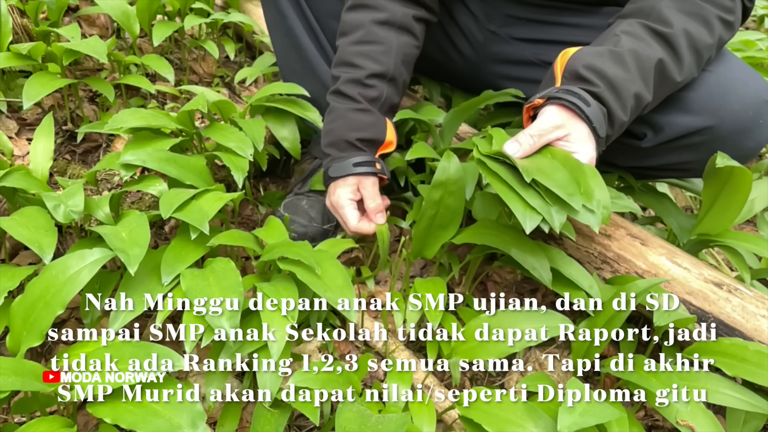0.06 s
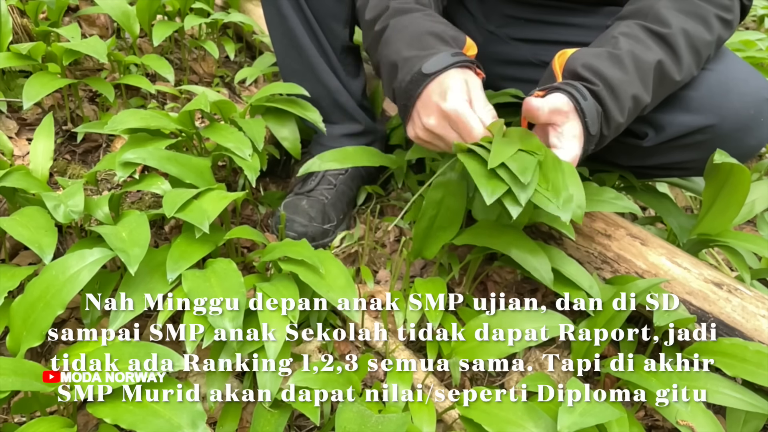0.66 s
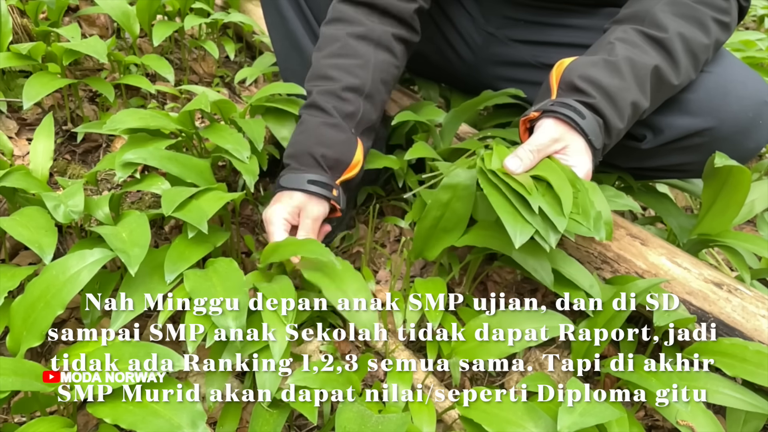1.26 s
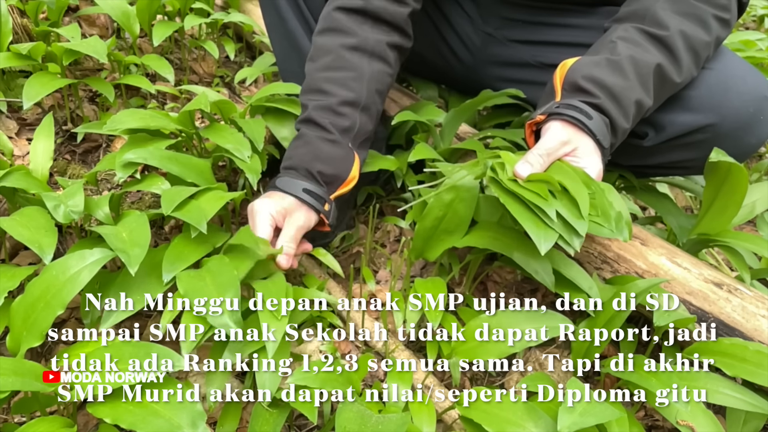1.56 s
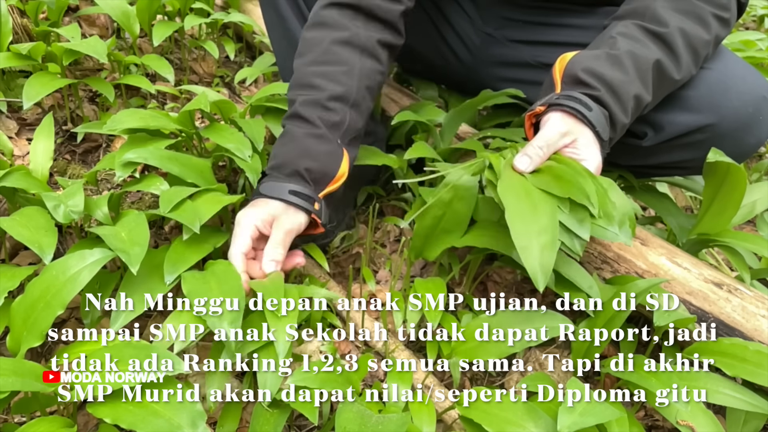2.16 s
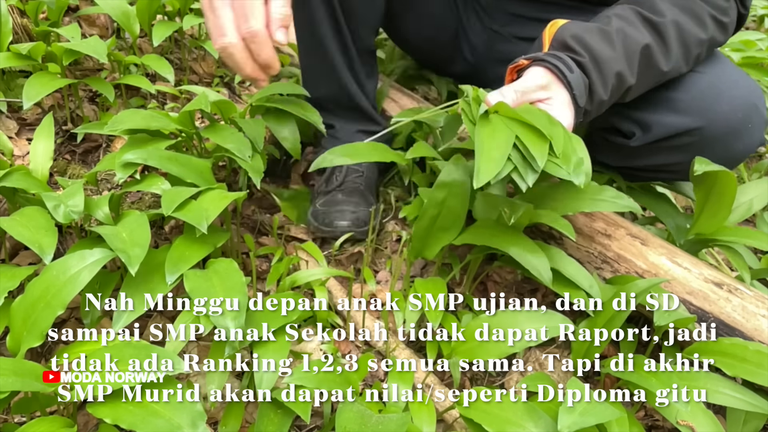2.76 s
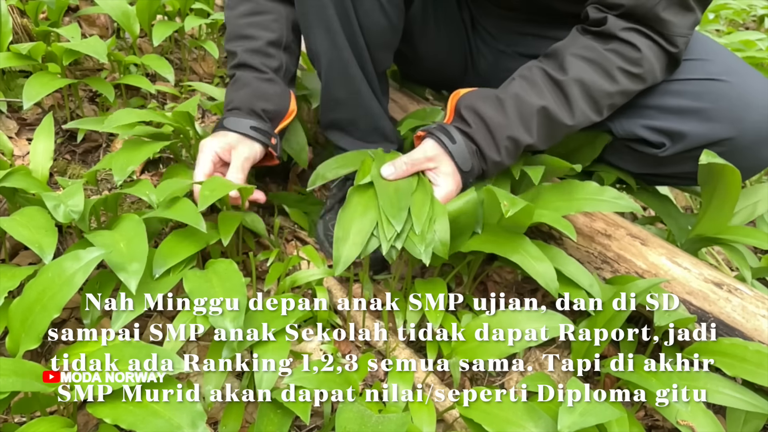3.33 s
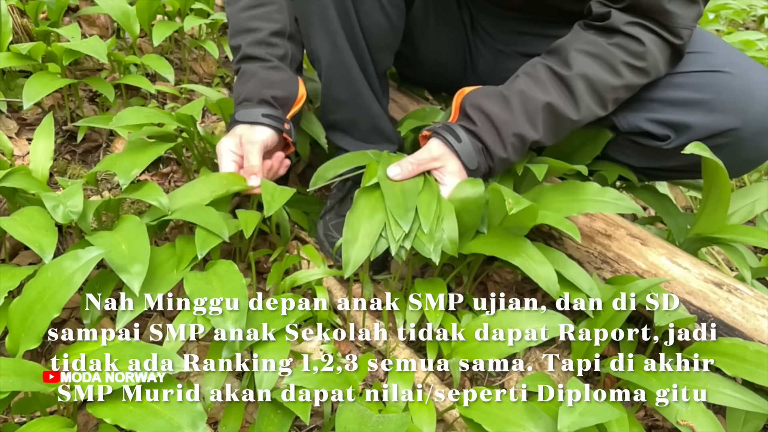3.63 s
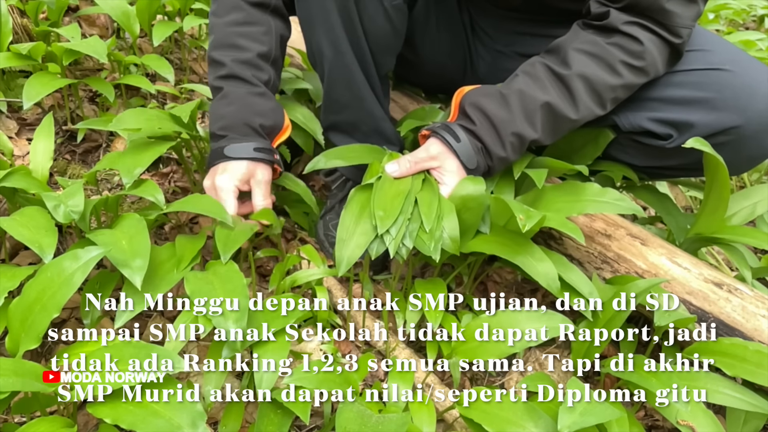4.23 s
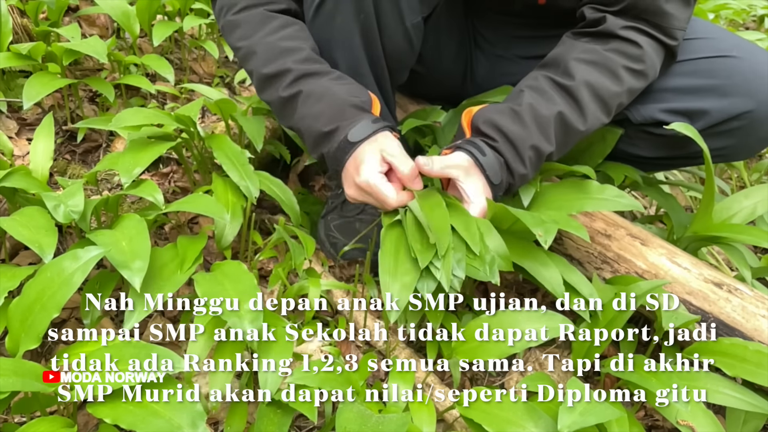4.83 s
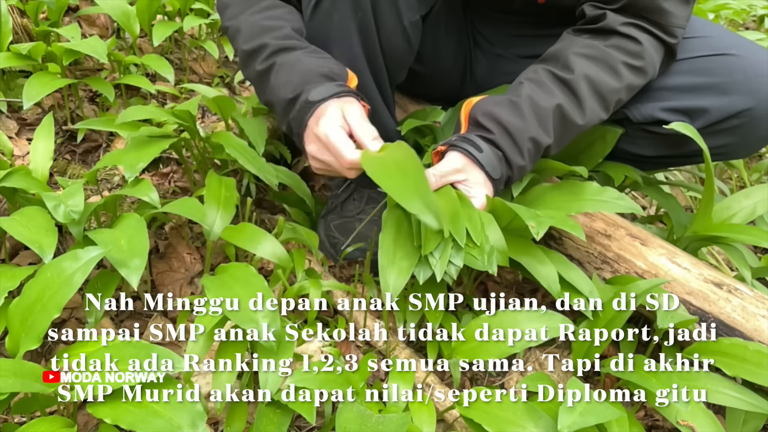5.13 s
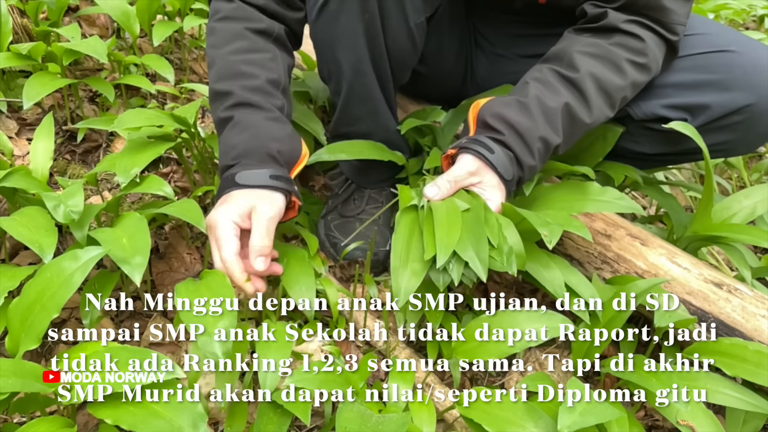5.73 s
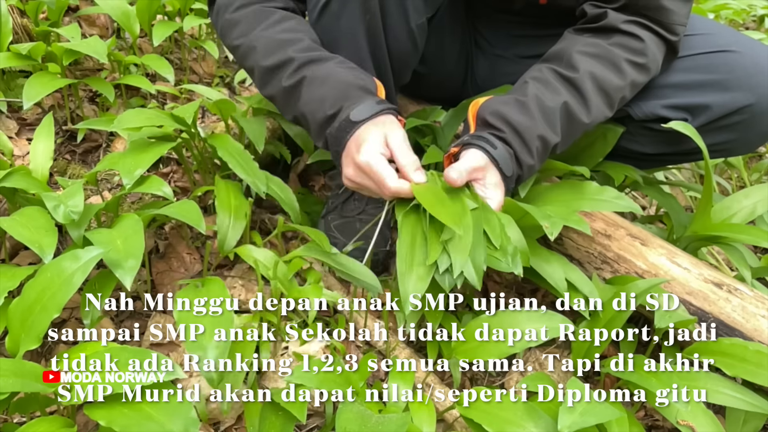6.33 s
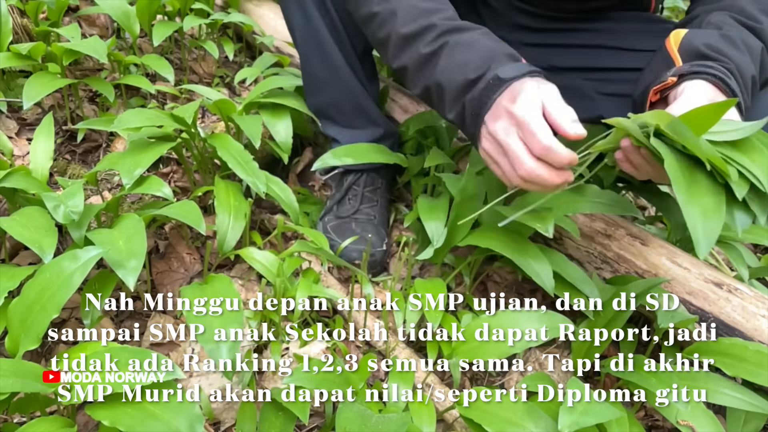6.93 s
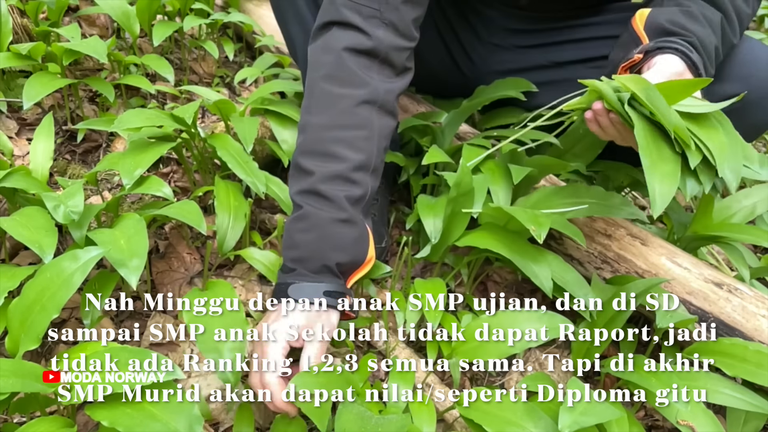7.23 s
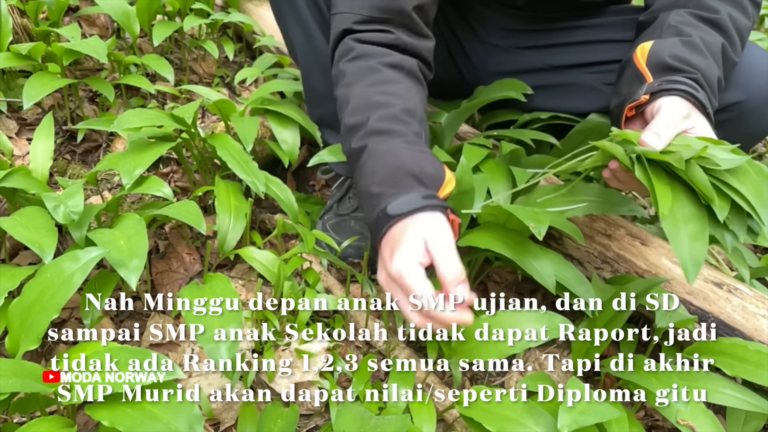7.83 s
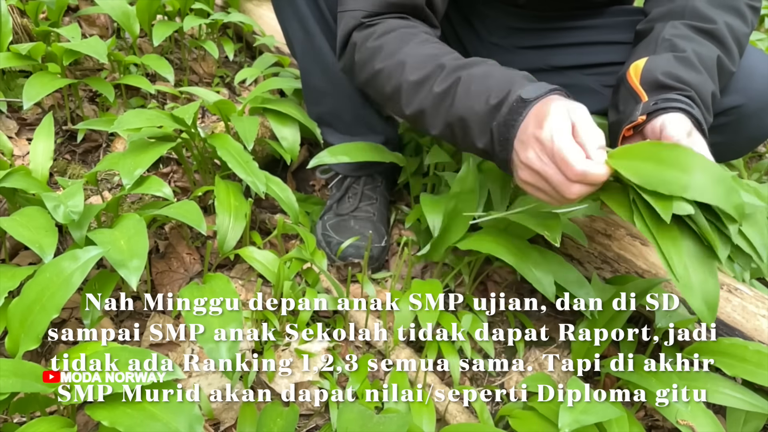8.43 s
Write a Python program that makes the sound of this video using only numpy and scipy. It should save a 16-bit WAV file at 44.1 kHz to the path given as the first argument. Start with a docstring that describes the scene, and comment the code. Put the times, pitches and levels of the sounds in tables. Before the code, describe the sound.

In a quiet forest, leaves rustle and a sleeve swishes near the microphone as a hand plucks plants with small ticks and pops. The rustling swells, then a stem breaks with a sharp double crack, the loudest sound. More crisp snaps and pops come later. Behind them, scattered bird whistles grow louder and more frequent, with a light echo, above soft outdoor air and a faint, low engine drone.

```python
"""Juicy stems crack, ring and whip back as someone crouching in a forest picks broad leaves by hand.
Single fibres part with a tick, and released leaves spring free with a hollow pop.
Friction gives each stroke of the arm a rustle of plants and the swish of a jacket sleeve.
Small birds whistle, their notes scattered by the trees, over a faint hush and a far engine's hum."""
import sys
import numpy as np
from scipy import signal
from scipy.fft import rfft, irfft, next_fast_len
from scipy.io import wavfile
from scipy.ndimage import uniform_filter1d, map_coordinates

SR = 44100
rng = np.random.default_rng(int(sys.argv[2]) if len(sys.argv) > 2 else 0)


def wav_record(signal):
    """Record a signal, one row per channel, as 16-bit PCM in the file named by sys.argv[1]."""
    frames = np.transpose(np.atleast_2d(signal))
    bounded = np.clip(frames, -1, 1)
    # unit amplitude maps onto the largest positive 16-bit level
    quanta = np.round(bounded * 32767).astype(np.int16)
    wavfile.write(sys.argv[1], SR, quanta)


N = 378378

# Stereo width of a near sound. Each row: frequency in Hz, side minus mid in dB.
NEAR_WIDTH = [(120, -14), (500, -7.5), (1300, -8.5), (4400, 1), (8000, 2.5), (10500, -70), (14000, 9)]


def amp(db):
    """Amplitude grows tenfold for every 20 dB."""
    return 10 ** (np.asarray(db) / 20)


def unit(x):
    """Normalisation to rms 1."""
    return x / np.sqrt(np.mean(x ** 2) + 1e-20)


def along(points, hz):
    """Interpolation of (Hz, value) points on a logarithmic frequency axis."""
    freqs, values = np.transpose(points)
    return np.interp(np.log(hz + 1), np.log(freqs + 1), values)


def curves(rows):
    """Linear interpolation in time: one curve for each column after the first."""
    times, *columns = np.transpose(rows)
    return [np.interp(np.arange(N) / SR, times, column) for column in columns]


def wobble(rate):
    """Smooth random modulation: a spline through rate knots a second."""
    knots = rng.standard_normal(int(N * rate / SR) + 4)
    return map_coordinates(knots, [np.arange(N) * rate / SR])


def filtered(x, response):
    """Linear filtering multiplies the spectrum by a frequency response."""
    n = x.shape[-1]
    padded = next_fast_len(n + 4096)
    return irfft(rfft(x, padded) * response(np.fft.rfftfreq(padded, 1 / SR)), padded)[..., :n]


def noise(spectrum, size=N):
    """Two uncorrelated noises of one spectral shape, rms 1."""
    return unit(filtered(rng.standard_normal((2, size)), lambda hz: amp(along(spectrum, hz))))


def add(track, s, sound):
    """Superposition: a sound joins the track from second s on."""
    start = max(round(s * SR), 0)
    room = track[..., start:start + sound.shape[-1]]
    room += sound[..., :room.shape[-1]]


def stereo(pair, width, direct, lag_s=9e-5):
    """Mid-side stereo from a sound and its scattered twin; the direct share leads on the left."""
    lead = lambda hz: np.clip(direct, 0, 1) * np.sin(2 * np.pi * hz * lag_s)
    side = filtered(pair[0], lambda hz: 1j * lead(hz) * amp(along(width, hz)))
    side += filtered(pair[1], lambda hz: np.sqrt(1 - lead(hz) ** 2) * amp(along(width, hz)))
    return np.array([pair[0] + side, pair[0] - side])


def air(db=-57):
    """A diffuse noise field: the gently wavering hush of the forest."""
    # Each row: frequency in Hz, relative spectral density in dB.
    hush_spectrum = [(25, -9), (55, 12), (110, 8.5), (220, -0.5), (600, -2.5), (1100, -18.5), (2400, -7),
                     (3800, -0.5), (7500, -21), (10500, -14), (15000, -51)]
    # Each row: frequency in Hz, side minus mid in dB.
    far_width = [(60, -4.5), (400, 0), (4400, 0.5), (10500, -43)]
    waver_db = 1.8 * wobble(4)
    return stereo(amp(db + waver_db) * noise(hush_spectrum), far_width, direct=0)


def engine(fundamental_hz=60.1, drift=0.00497, low_gain_db=2):
    """Low frequencies carry farthest: of a distant engine only two orders and a rumble remain."""
    # Each row: time in seconds, relative levels of the fundamental and of the octave in dB.
    order_levels = [(0, -56.5, -71.5), (2.2, -55.5, -72), (2.9, -54, -57), (3.9, -49.5, -49),
                    (5.2, -51.5, -53), (6.3, -65.5, -57), (7.3, -50, -55), (8.58, -38, -57)]
    # Each row: frequency in Hz, relative spectral density in dB.
    rumble_spectrum = [(35, 4), (90, 8), (170, -3), (350, -39)]
    low_db, octave_db = curves(order_levels)
    phase = 2 * np.pi * np.cumsum(fundamental_hz * (1 + drift * wobble(2.5))) / SR
    fundamental = amp(low_db + low_gain_db + wobble(6.7)) * np.sin(phase)
    octave = amp(octave_db + wobble(2.04)) * np.sin(2 * phase)
    rumble = amp(octave_db + 2 * wobble(5)) * noise(rumble_spectrum)
    return fundamental + octave + stereo(rumble, NEAR_WIDTH, direct=0)


def swell(middle_s, length_s, edge_db=9, steepness=2.9):
    """Amplitude follows speed: a movement gathers pace, peaks and slows again."""
    away = np.abs(np.arange(N) / SR - middle_s) / (length_s / 2)
    return amp(-edge_db * np.minimum(away, 10) ** steepness)


def crinkle(rate, spread_db, life_s):
    """Shot noise: the envelope of many tiny contacts whose energy decays exponentially, rms 1."""
    sizes = amp(spread_db * np.minimum(rng.exponential(size=N), 4))
    contacts = (rng.random(N) < rate / SR) * sizes ** 2
    energy = signal.lfilter([1], [1, -np.exp(-1 / (life_s * SR))], contacts)
    return unit(np.sqrt(energy))


def crackles(rate=40, centre_hz=3300, octaves=2.2, cycles=3.8, range_db=8):
    """Stalks and leaf edges catch on each other, each click a damped oscillation; rms 1."""
    out, t = np.zeros((2, N)), np.arange(SR // 100) / SR
    for when, pitch, size in rng.random((int(rate * N / SR), 3)):
        hz = centre_hz * 2 ** (octaves * (pitch - .5))
        click = np.sin(2 * np.pi * hz * t) * np.exp(-t * hz / cycles) * np.sqrt(hz)
        add(out, when * N / SR, amp(range_db * size) * click)
    return unit(out)


def rustle(leaf_db=2.5, sleeve_db=3, cloth_db=2, brightening=0.076, even_db=-50):
    """Friction noise of leaves, sleeve and pressed cloth; overlapping movements add in power."""
    # The held bunch never lies still. Each row: time in seconds, relative level in dB.
    bunch_levels = [(0.0, -63.5), (0.91, -61), (1.38, -68), (1.72, -61.5), (2.6, -52.5), (3.39, -54),
                    (3.7, -51.5), (5.81, -61), (6.48, -54), (6.86, -45.5), (7.03, -55), (7.62, -57),
                    (8.58, -47.5)]
    # Arm strokes. Each row: middle and length in seconds, relative leaf and sleeve levels in dB.
    strokes = [(0.11, 0.22, -59, -58), (1.22, 0.3, -55.5, -56.5), (1.45, 0.23, -49, -59.5),
               (1.966, 0.14, -59, -58.5), (2.204, 0.15, -56.5, -59.5), (2.77, 0.49, -58, -57),
               (3.13, 0.14, -47.5, -50.5), (3.593, 0.32, -46, -46), (3.831, 0.14, -48.5, -52),
               (3.937, 0.15, -44, -48.5), (4.496, 0.78, -53, -54.5), (5.162, 0.19, -53.5, -60),
               (5.535, 0.14, -55, -62.5), (5.954, 0.15, -48, -54), (6.11, 0.32, -52, -62.5),
               (6.722, 0.19, -43.5, -70), (6.964, 0.18, -47.5, -66), (7.463, 0.028, -48, -76),
               (8.088, 0.16, -52, -60.5), (8.442, 0.17, -50, -56.5)]
    # Cloth on cloth. Each row: middle and length in seconds, relative level in dB.
    rubs = [(2.002, 0.052, -51.5), (3.551, 0.35, -44.5), (3.933, 0.17, -44), (4.484, 0.84, -52),
            (6.717, 0.22, -48.5)]
    # Three friction spectra. Each row: frequency in Hz, relative spectral density in dB.
    leaf_spectrum = [(300, -5.5), (1200, -9.5), (2200, -29), (3500, 2), (6000, 2.5), (7500, -2.5),
                     (9500, 3.5), (12000, 2), (14000, -6.5), (16000, -102)]
    sleeve_spectrum = [(150, -13), (400, -8), (750, -3.5), (1300, 6.5), (1900, 10), (3000, 7.5), (4500, -5),
                       (9000, -42)]
    cloth_spectrum = [(35, -26), (70, -3), (130, 3.5), (300, -3), (600, -4), (1100, -6), (2500, -20),
                      (6000, -60)]
    bunch_db, = curves(bunch_levels)
    leaves, sleeve, pressure = amp(bunch_db - 1), amp(bunch_db - 8), np.zeros(N)
    for s, length, rustle_db, swish_db in strokes:
        speed = swell(s, length)
        leaves = np.hypot(leaves, amp(rustle_db) * speed)
        sleeve = np.hypot(sleeve, amp(swish_db) * speed)
    for s, length, db in rubs:
        pressure = np.hypot(pressure, amp(db) * swell(s, length))
    sliding = amp(1.7 * wobble(40)) * noise(leaf_spectrum)
    ticking = .62 * crinkle(rate=150, spread_db=2.2, life_s=.0007) * noise(leaf_spectrum)
    # Faster sliding is brighter as well as louder.
    treble = filtered(sliding + ticking, lambda hz: hz > 7500)
    body = sliding + ticking - treble
    sheen = (leaves / amp(even_db)) ** brightening
    out = amp(leaf_db) * leaves * (treble * sheen + body / sheen)
    # Single catches stand out in slow handling and are masked in a fast stroke.
    out += .4 * np.minimum(leaves, amp(-53)) * filtered(crackles(), lambda hz: hz < 14000)
    out += sleeve * amp(sleeve_db + 1.5 * wobble(50)) * noise(sleeve_spectrum)
    # Pressed folds stick and slip, which makes the rub low and rough.
    stick_slip = crinkle(rate=500, spread_db=2.0, life_s=0.0034)
    out += amp(cloth_db) * pressure * stick_slip * noise(cloth_spectrum)
    return stereo(out, NEAR_WIDTH, direct=0.63)


def crack(t, bright_db, tear_s, tail_s=0.028, tail_db=-27, ragged_db=3):
    """Fracture: fibres part in a ragged noise burst with a shivering tail, rms 1 over its onset."""
    # Each row: frequency in Hz, relative spectral density in dB.
    spectrum = [(200, -5.5), (1400, 2.5), (2200, 0), (2800, 3.5), (3600, -4.5), (4900, 3.5), (5800, -2),
                (7500, -9), (10500, -5.5), (13000, -8), (15500, -28.5)]
    colour = [(hz, db + bright_db * np.clip(np.log2(hz / 4500), 0, 1)) for hz, db in spectrum]
    roughness = unit(uniform_filter1d(rng.standard_normal(len(t)), size=16))
    tear = unit(amp(ragged_db * roughness)) * np.exp(-t / tear_s)
    tail = amp(tail_db) * np.exp(-t / tail_s)
    onset = np.minimum(t / (.4 * tear_s), 1)
    burst = noise(colour, size=len(t)) * onset * (tear + tail)
    return burst / np.sqrt(np.mean(burst[:, :SR // 300] ** 2, axis=1, keepdims=True))


def ticks(gain_db=2, tear_s=0.00049):
    """A single fibre, too thin to whip, radiates only the crack of its fracture."""
    # Each row: start in seconds, relative level in dB, treble boost in dB.
    fibres = [(0.017, -41, 19), (0.3309, -41, 10.5), (0.546, -49.5, 23), (0.5903, -46, 10),
              (0.835, -44.5, 2), (0.851, -42, 19), (1.635, -42.5, 2.5), (1.9037, -35, 15.5),
              (1.959, -39, 13), (2.401, -52, 3), (3.378, -43, 15), (4.394, -32, 4), (4.9752, -36.5, 15),
              (4.985, -35.5, 10.5), (5.043, -28.5, 23), (6.71, -28, 12), (6.7314, -26, 20),
              (6.7637, -27.5, 21), (7.431, -38, 52), (7.463, -33, 37), (7.47, -36.5, 44)]
    out, t = np.zeros((2, N)), np.arange(SR // 5) / SR
    for s, db, bright_db in fibres:
        add(out, s, amp(db + gain_db) * crack(t, bright_db, tear_s, tail_s=0.014, tail_db=-16.5))
    return stereo(out, NEAR_WIDTH, direct=0.26)


def whip(t, sweep_hz, glide_s, rest_hz, fade_s, rise_s=0.00025, thinning=0.6):
    """Dispersion: high bending waves travel faster along a stalk, so the pitch falls as it fades."""
    spread = 1 + t / glide_s
    hz = rest_hz + sweep_hz * amp(.5 * rng.normal()) / spread ** 2
    phase = 2 * np.pi * (np.cumsum(hz) / SR + rng.random((2, 1)))
    return np.sin(phase) * (1 - np.exp(-t / rise_s)) * np.exp(-t / fade_s) / spread ** thinning


def flicks(pop_db=1, pop_cycles=1.44, puff_db=-10, puff_s=0.0052, shiver_db=-15, shiver_s=0.17):
    """Free vibration: a released leaf pops, puffs and shivers, and its stalk swings back."""
    # Each row: start in seconds, relative level in dB, pitch of the pop in Hz.
    releases = [(0.076, -39, 1430), (0.769, -42.5, 1530), (0.841, -37.5, 900), (1.273, -39, 885),
                (1.956, -39.5, 1120), (4.911, -35.5, 755), (5.075, -39, 670), (5.106, -36.5, 800),
                (5.135, -38, 714), (5.197, -38.5, 875), (5.43, -33, 800), (5.482, -39, 1090),
                (5.58, -36, 540), (6.65, -34.5, 650), (6.864, -27, 550), (6.956, -27.5, 546),
                (7.538, -38, 810), (8.227, -29, 780), (8.459, -30, 1500)]
    out, t = np.zeros((2, N)), np.arange(SR // 10) / SR
    for s, db, hz in releases:
        pop = np.sin(2 * np.pi * hz * t) * (1 - np.exp(-2 * t * hz)) * np.exp(-t * hz / pop_cycles)
        blade_spectrum = [(hz / 4, -14), (hz, 0), (2 * hz, -9), (5 * hz, -30)]
        envelope = np.exp(-t / puff_s) + amp(shiver_db) * np.exp(-t / shiver_s)
        puff = noise(blade_spectrum, size=len(t)) * envelope
        stalk = whip(t, sweep_hz=1055, glide_s=0.0037, rest_hz=88, fade_s=0.0098)
        add(out, s, amp(db) * (amp(pop_db) * pop + amp(puff_db) * puff + amp(-6) * stalk))
    return stereo(out, NEAR_WIDTH, direct=0.87)


def glide(length_s, start_hz, end_hz, ease=1.4):
    """A power-law sweep: the pitch moves fast at first, then settles."""
    return end_hz + (start_hz - end_hz) * np.linspace(1, 0, int(length_s * SR)) ** ease


def swoop(length_s, start_hz, end_hz=3670, rasp=0.0353):
    """Rapid random frequency modulation makes a falling pitch raspy."""
    hz = glide(length_s, start_hz, end_hz, ease=1.6)
    return hz * (1 + rasp * wobble(700)[:len(hz)])


def arch(length_s, top_hz, climb=0.12, drop=0.19, waver=0.0096):
    """An arched frequency sweep: the pitch climbs quickly, trembles and flicks down at the end."""
    u = np.linspace(0, 1, int(length_s * SR))
    return top_hz * (1 - climb * (1 - u) ** 7 - drop * u ** 9 + waver * wobble(250)[:len(u)])


def bird_notes():
    """Each note is a frequency contour, given as (start in seconds, Hz per sample, dB)."""
    # Held notes. Each row: start and length in seconds, pitch in Hz, relative level in dB.
    whistles = [(0.335, 0.07, 3750, -59), (0.401, 0.071, 3500, -66), (1.34, 0.1, 2120, -55),
                (1.537, 0.061, 3270, -55), (1.615, 0.074, 2586, -49.5), (2.262, 0.038, 2097, -54.5),
                (2.58, 0.038, 2206, -51.5), (4.758, 0.084, 2152, -57.5), (4.921, 0.06, 3050, -52),
                (5.058, 0.04, 4950, -52), (7.661, 0.1, 4587, -40)]
    # Each row: start and length in seconds, first and last pitch in Hz, relative level in dB.
    slurs = [(0.297, 0.017, 4410, 4960, -56), (1.639, 0.17, 2453, 2135, -55),
             (5.519, 0.05, 4200, 4730, -48.5), (5.817, 0.057, 6580, 5330, -51),
             (6.253, 0.037, 5100, 3460, -45), (6.38, 0.18, 7750, 6760, -51),
             (6.594, 0.015, 3540, 5000, -46), (6.891, 0.017, 3340, 4880, -46.5),
             (7.042, 0.027, 3450, 5100, -45), (7.069, 0.028, 6080, 6480, -45.5),
             (7.19, 0.056, 5640, 3440, -41), (7.298, 0.043, 2810, 3690, -48.5),
             (7.372, 0.032, 2950, 3520, -45.5), (7.445, 0.028, 2780, 3420, -53),
             (7.797, 0.038, 4100, 2670, -47), (7.91, 0.041, 4160, 3336, -44.5),
             (8.328, 0.034, 4180, 2870, -47), (8.448, 0.041, 4120, 3410, -45.5)]
    # Each row: start and length in seconds, top pitch in Hz, relative level in dB.
    arches = [(1.567, 0.06, 4640, -52.5), (7.509, 0.15, 6146, -43), (8.016, 0.13, 6165, -44),
              (8.187, 0.12, 6330, -43.5)]
    # A distant bird. Each row: start and length in seconds, first pitch in Hz, relative level in dB.
    swoops = [(1.354, 0.13, 5200, -56.5), (1.739, 0.12, 5200, -54.5), (5.197, 0.084, 5600, -51),
              (5.385, 0.05, 4880, -50), (5.621, 0.11, 4910, -50)]
    notes = [(s, glide(length, hz, hz), db) for s, length, hz, db in whistles]
    notes += [(s, glide(length, first, last), db) for s, length, first, last, db in slurs]
    notes += [(s, arch(length, hz), db) for s, length, hz, db in arches]
    return notes + [(s, swoop(length, hz), db) for s, length, hz, db in swoops]


def whistled(notes, waver=0.011, flicker_db=3, near_db=-44, direct_loss=0.75):
    """Sines modulated in pitch and level make the song; returns it and its unscattered part."""
    song, direct = np.zeros(N), np.zeros(N)
    flutter, flicker = wobble(300), amp(flicker_db * wobble(60))
    for s, hz, db in notes:
        during = lambda curve: np.roll(curve, -round(s * SR))[:len(hz)]
        phase = 2 * np.pi * np.cumsum(hz * (1 + waver * during(flutter))) / SR
        envelope = signal.windows.tukey(len(hz), .3) * during(flicker)
        note = amp(db) * unit(envelope * np.sin(phase))
        add(song, s, note)
        # The fainter the bird, the smaller the share that arrives directly.
        add(direct, s, amp(direct_loss * min(db - near_db, 0)) * note)
    return song, direct


def trunks(x, spread_s=0.06):
    """Early reflections: the trunks nearest a bird return many weak copies that blur each note."""
    t = np.arange(SR // 5) / SR
    copies = rng.standard_normal((2, len(t))) * np.exp(-t / spread_s)
    return signal.fftconvolve(x[None], copies / np.linalg.norm(copies[0]), axes=1)[:, :N]


def trees(x):
    """Reverberation: trunks scatter a sound into a thin, wide tail."""
    # Each row: frequency in Hz, time to decay by 60 dB in seconds.
    decay_times = [(200, 0.6), (4000, 0.91), (12000, 0.35)]
    hz, t, spectra = signal.stft(rng.standard_normal((2, SR)), SR, nperseg=256)
    decay = amp(-60 * t / along(decay_times, hz)[:, None])
    tail = signal.istft(spectra * decay, SR, nperseg=256)[1]
    return signal.fftconvolve(x[None], tail / np.linalg.norm(tail[0]), axes=1)[:, :N]


def birds(left_db=2, right_db=0, echo_db=1):
    """Multipath propagation: song arrives directly, off nearby trunks and as reverberation."""
    song, direct = whistled(bird_notes())
    heard = direct + .3 * trunks(song) + amp(echo_db) * trees(song)
    return amp([[left_db], [right_db]]) * heard


def snaps(crack_db=2, whip_db=14, ring_cycles=2.16, ring_rise_s=0.00078, overtone=4, overtone_db=-8):
    """Fracture frees a bent stem: it cracks, its hollow resonates briefly, and it whips back."""
    # Each row: start in seconds, relative crack level, treble boost and relative whip level in dB,
    # ring pitch in Hz, ring level in dB.
    stems = [(1.041, -29, 8, -44.5, 2800, -39), (4.355, -11, 10, -25, 1320, -4),
             (4.4297, -29, 8, -28, 820, -34), (4.436, -11.5, 6, -25.5, 349, -11),
             (6.714, -25, 27, -35, 405, -28.5), (6.7244, -20, 24.5, -40, 1790, -18),
             (6.8415, -19.5, 19.5, -33.5, 1680, -15), (6.9309, -32.5, 10.5, -39.5, 1590, -23),
             (8.2706, -19.5, 11, -59, 790, -20.5)]
    out, t = np.zeros((2, N)), np.arange(SR // 5) / SR
    for s, db, bright_db, bend_db, ring_hz, ring_db in stems:
        # A thick stem, which whips hard, takes longer to tear through.
        tear_s = np.interp(bend_db, [-45, -20], [0.0014, 0.0026])
        add(out, s, amp(db + crack_db) * crack(t, bright_db, tear_s))
        swing = whip(t, sweep_hz=2360, glide_s=0.00279, rest_hz=68,
                     fade_s=0.055, rise_s=0.0052, thinning=0.77)
        phase = 2 * np.pi * ring_hz * t
        modes = np.sin(phase) + amp(overtone_db) * np.sin(overtone * phase)
        ring = modes * (1 - np.exp(-t / ring_rise_s)) * np.exp(-t * ring_hz / ring_cycles)
        add(out, s, amp(bend_db + whip_db) * swing + amp(ring_db) * ring)
    return stereo(out, NEAR_WIDTH, direct=1.0)


def scene(echo_db=-24):
    """Superposition of the near picking, its faint reverberation and the far forest."""
    hands = snaps() + ticks() + flicks() + rustle()
    return hands + amp(echo_db) * trees(hands.mean(0)) + birds() + engine() + air()


def record(dry, low_cut_hz=38, top_hz=15900):
    """The microphone is band-limited and clips any peak beyond full scale."""
    heard = filtered(dry, lambda hz: 1 / np.sqrt(1 + (low_cut_hz / (hz + 1)) ** 8))
    return filtered(np.clip(heard, -1, 1), lambda hz: hz < top_hz)


dry = scene()
out = record(dry)
wav_record(out)
```